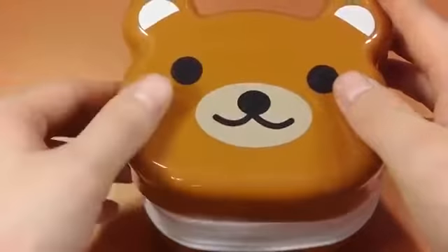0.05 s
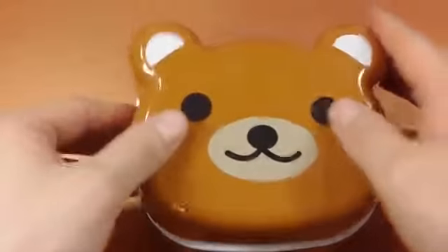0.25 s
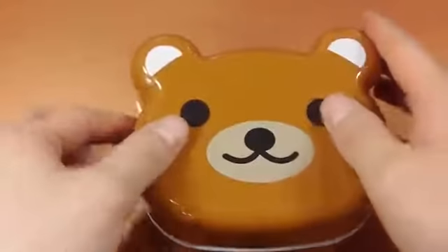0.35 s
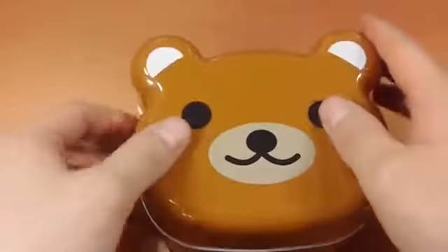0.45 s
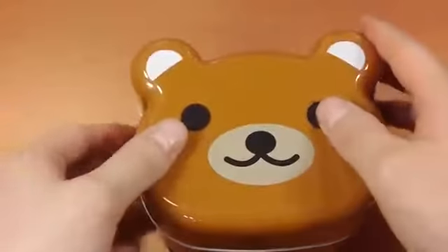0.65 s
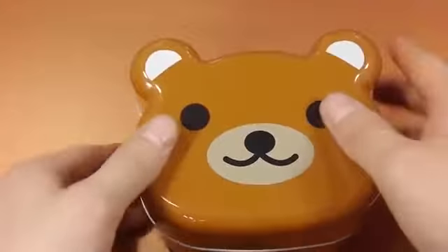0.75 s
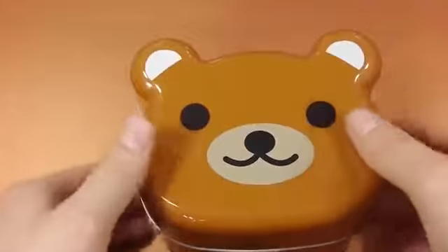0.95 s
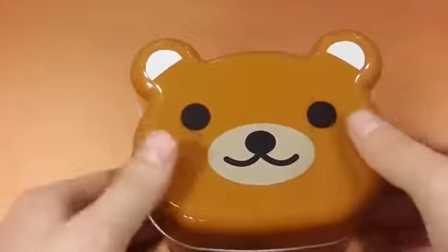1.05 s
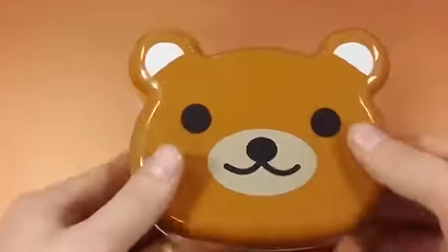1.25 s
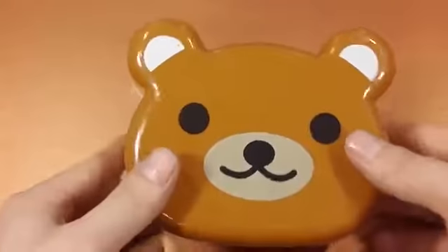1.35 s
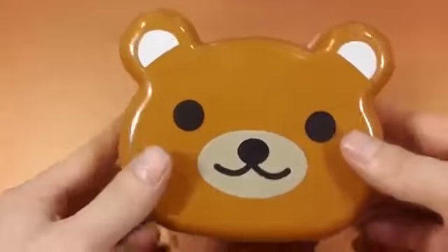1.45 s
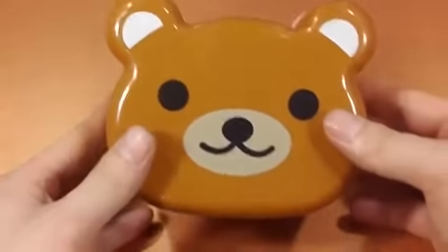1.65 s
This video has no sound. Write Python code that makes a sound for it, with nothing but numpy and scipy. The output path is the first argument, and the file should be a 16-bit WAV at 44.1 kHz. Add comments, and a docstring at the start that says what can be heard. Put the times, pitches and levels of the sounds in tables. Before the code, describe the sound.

A plastic lid clacks onto a hollow tub, rattles briefly and is pressed shut.

```python
"""A few light bumps, then a sharp plastic clack: a moulded lid lands on its tub, rocks and is pressed home.
Each contact rings the lid and the hollow tub and thumps the table, close by in a small quiet room.
The rim ticks and scrapes in tiny slips, and fingers rub and slide over the plastic.
A low room rumble lies under it all."""
import sys
import numpy as np
from scipy import signal
from scipy.fft import rfft, irfft, next_fast_len
from scipy.io import wavfile
from scipy.ndimage import map_coordinates

SR = 44100
rng = np.random.default_rng(int(sys.argv[2]) if len(sys.argv) > 2 else 0)


def generate_wav(signal):
    """Clip the signal to [-1, 1] and save it as 16-bit WAV at the path in sys.argv[1]."""
    frames = np.transpose(np.atleast_2d(signal))
    scaled = np.clip(frames, -1, 1) * 32767
    pcm = np.round(scaled).astype(np.int16)
    wavfile.write(sys.argv[1], SR, pcm)


N = 74970

# room rumble and hiss: freq_hz, density_db
AIR_SPECTRUM = [(15, -71), (25, -22), (43, -14), (121, 1), (167, -4.5), (309, -3.5), (383, -5.5),
                (501, -2.5), (749, -6), (856, -6.5), (978, -7), (1460, -14.5), (2130, -26.5), (3630, -30),
                (15000, -37.5)]
# faint drones in the room: pitch_hz, level_db
DRONES = [(66, -59), (104, -57.5), (143, -63), (766, -62)]
# length of the room's tail: freq_hz, t60_s
TAIL_DECAY = [(100, 0.36), (300, 0.36), (700, 0.35), (2000, 0.23), (5000, 0.32), (13000, 0.19)]
# colour of the room's tail: freq_hz, gain_db
TAIL_COLOUR = [(100, -10.5), (300, -9), (700, -8), (2000, -14), (5000, -11.5), (13000, -10)]

# strokes of fingers and rim: start_s, rise_s, fall_s, level_db, tilt_db_per_octave, resonance_hz
RUB_STROKES = [(0.137, 0.084, 0.37, -49.5, -1.5, 2240), (0.272, 0.0035, 0.21, -40.5, 0, 2540),
               (0.394, 0.032, 0.033, -51.5, 10, 5800), (0.93, 0.016, 0.98, -61, 0, 3630),
               (1.24, 0.095, 0.55, -51, -1, 4000), (1.46, 0.027, 0.47, -55, 14, 1770)]
# colour of the rubbing: freq_hz, density_db
RUB_SPECTRUM = [(150, -6), (500, 5), (1700, 2), (2700, -5), (5000, -9.5), (9000, -13), (15000, -22)]
# short drags of the rim: start_s, rise_s, length_s, level_db, resonance_hz, tilt_db_per_octave
RIM_SCRAPES = [(0.275, 0.0022, 0.028, -41.5, 2540, -0.5), (1.076, 0.012, 0.043, -47, 1730, -0.5)]
# colour of the scraping: freq_hz, density_db
SCRAPE_SPECTRUM = [(300, -10), (1500, 6), (2600, 1), (4000, -16), (6000, -3), (10000, -13), (15000, -12)]
# small ticks of the plastic edge: start_s, level_db, centre_hz
EDGE_TICKS = [(0.406, -48, 6900), (0.411, -44.5, 6100), (0.797, -45.5, 2040), (0.83, -42, 2750),
              (1.219, -62, 10200)]
# dull nudges of hand and tub on the table: start_s, level_db, pitch_hz
TABLE_NUDGES = [(0.31, -44, 130), (0.625, -39, 115), (1.06, -44, 143), (1.485, -45, 520)]

# the lid hitting the tub: start_s, level_db, cutoff_hz (higher is harder),
# crack_db, tub_db, thump_db, snap_db (layer trims on top of level_db),
# favoured_hz, favour_db (the band that the contact point brings out, and its boost)
CONTACTS = [(0.099, -27.5, 2630, -8.5, 5, -4, -11, 1620, 5),
            (0.185, -23.5, 1200, -4, -4, -19, -43, 654, 13),
            (0.2143, -11.5, 847, -13, 3, -5.5, -53, 920, 6.8),
            (0.2413, -20.5, 1400, 0, 7.5, -27, -13.5, 570, 7.7),
            (0.343, 0.5, 3880, -5, -1.5, -9, -13, 3510, 6.4), (0.407, -19, 1080, 2, -4, -14, -38, 470, 4.5),
            (0.429, -22, 1240, -2, -27, -29, -43, 1120, 16), (0.4431, -8, 4170, 1, -2, -1, 0, 820, 10.4),
            (0.4492, -6, 5600, 1.5, -5.5, -8.5, -8, 4460, 3.4),
            (0.4496, -13, 2400, 1, 5, 8.5, -33, 480, 10.5), (0.5083, -13.5, 2300, -7, -4, 9, -24, 1940, 5),
            (0.538, -9.5, 3140, 1.5, -6, 5, -13, 4150, 8.9), (0.6, -18, 2280, 6, -5, 10.5, -14, 2350, 9.6),
            (0.8436, -19.5, 2920, 4.5, 9, 17.5, -1, 2090, 6.3)]
# modes of the plastic lid: pitch_hz, level_db, t60_s
LID_MODES = [(660, -21, .03), (868, -13, .04), (958, -21, .03), (1120, -25, .04), (1305, -18, .035),
             (1430, -18, .028), (1690, -17, .026), (1810, -20, .026), (1925, -17, .024), (2380, -25, .022),
             (2710, -27, .024), (3620, -26, .02), (4200, -30, .018)]
# modes of the hollow tub: pitch_hz, level_db, t60_s
TUB_MODES = [(310, -25, .12), (436, -19, .07), (500, -17, .06), (555, -19, .055)]
# modes of the table under the tub: pitch_hz, level_db, t60_s
TABLE_MODES = [(99, -34, .18), (135, -26, .1), (243, -23, .07), (335, -22, .055)]
# the plastic's dense, quickly dying upper modes: freq_hz, density_db
CRACK_SPECTRUM = [(100, -35), (400, 3), (700, -4.5), (1000, -6), (1900, 0), (3100, -11), (5000, -6),
                  (10000, -21.5), (15000, -15)]
# colour of the edge snap's noise burst: freq_hz, density_db
SNAP_SPECTRUM = [(500, 11.5), (2500, -1), (5000, 2), (10000, -2), (15000, -8)]

PLASTIC_RISE_S, TABLE_RISE_S = .0003, .0012
FRICTION_PEAK_OCTAVES = .22


def amp(db):
    """Decibels to gain."""
    return 10 ** (np.asarray(db) / 20)


def unit(x):
    """Scale to rms 1."""
    return x / np.sqrt(np.mean(x ** 2) + 1e-20)


def along(points, hz):
    """Read a (freq_hz, value) curve on a log axis."""
    freqs, values = np.transpose(points)
    return np.interp(np.log(hz + 1), np.log(freqs + 1), values)


def bell(hz, centre_hz, octaves):
    """An EQ bell, 1 at its centre."""
    return np.exp(-(np.log2((hz + 1) / centre_hz) / octaves) ** 2)


def decay(t, t60_s):
    """Exponential decay, 60 dB in t60_s."""
    return np.exp(-np.log(1000) * t / t60_s)


def filtered(x, gain):
    """EQ a sound with a gain that depends on frequency."""
    size = next_fast_len(len(x) + 8192)
    return irfft(rfft(x, size) * gain(np.fft.rfftfreq(size, 1 / SR)), size)[:len(x)]


def noise(spectrum, size, tilt=0):
    """Coloured noise of rms 1, tilted in dB per octave."""
    white = rng.standard_normal(size)
    return unit(filtered(white, lambda hz: amp(along(spectrum, hz) + tilt * np.log2(hz + 1))))


def wobble(knots_per_s):
    """A smooth random curve."""
    return map_coordinates(rng.standard_normal(N), [np.arange(N) * knots_per_s / SR])


def add(track, start_s, sound):
    """Mix a sound into the track at start_s."""
    start = max(round(start_s * SR), 0)
    track[start:start + len(sound)] += sound[:N - start]


def ring(modes, t, rise_s, scatter_db=1):
    """Damped modes of alternating polarity, struck a little differently every time."""
    waves = np.zeros(len(t))
    for k, (hz, db, t60_s) in enumerate(modes):
        gain = (-1) ** k * amp(db + scatter_db * rng.normal())
        waves += gain * decay(t, t60_s) * np.sin(2 * np.pi * hz * t)
    return waves * (1 - np.exp(-t / rise_s))


def chatter_envelope(t, hold_s=.0012):
    """A brief hold while the edges chatter, then a fast decay."""
    return decay(np.maximum(t - hold_s, 0), t60_s=.025)


def in_room(x, predelay_s=.0067):
    """A sound plus its own diffuse tail in the room."""
    hz, t, bands = signal.stft(rng.standard_normal(SR // 2), SR, nperseg=256)
    tail = signal.istft(bands * decay(t, along(TAIL_DECAY, hz)[:, None]), SR)[1]
    tail = np.pad(tail / np.linalg.norm(tail), (round(predelay_s * SR), 0))
    tail = filtered(tail, lambda f: amp(along(TAIL_COLOUR, f)))
    return x + signal.fftconvolve(x, tail)[:len(x)]


def room_tone(air_db=-50, wander_per_s=9.04):
    """The bed: steady rumble and hiss with a few wavering drones."""
    drones, t = np.zeros(N), np.arange(N) / SR
    for hz, db in DRONES:
        waver = wobble(wander_per_s) + 1j * wobble(wander_per_s)  # level and phase both drift
        drones += amp(db) * unit(np.real(waver * np.exp(2j * np.pi * hz * t)))
    return amp(air_db) * noise(AIR_SPECTRUM, N) + drones


def rubs(grain_db=2, grains_per_s=2200, peak_db=2.5):
    """Skin and rim slide on the plastic: grainy friction swells and fades through one resonance."""
    track, t = np.zeros(N), np.arange(N) / SR
    for start_s, rise_s, fall_s, db, tilt, peak_hz in RUB_STROKES:
        stroke = np.minimum(t / rise_s, 1) * np.exp(-2 * np.maximum(t - rise_s, 0) / fall_s)
        grains = noise(RUB_SPECTRUM, N, tilt) * amp(grain_db * wobble(grains_per_s))
        friction = filtered(grains, lambda hz: amp(peak_db * bell(hz, peak_hz, FRICTION_PEAK_OCTAVES)))
        add(track, start_s, amp(db) * stroke * unit(friction))
    return track


def scrapes(slips_per_s=1800, scatter_db=2, peak_db=10):
    """The rim sticks and slips at an uneven rate; each slip is a tiny gritty click."""
    track, t = np.zeros(N), np.arange(SR // 2) / SR
    for start_s, rise_s, length_s, db, peak_hz, tilt in RIM_SCRAPES:
        slipping = rng.random(len(t)) < slips_per_s / SR
        slips = slipping * amp(scatter_db * rng.standard_normal(len(t)))
        grit = unit(signal.fftconvolve(slips, decay(t, t60_s=.005))[:len(t)])
        hiss = noise(SCRAPE_SPECTRUM, len(t), tilt)
        hiss = unit(filtered(hiss, lambda hz: amp(peak_db * bell(hz, peak_hz, FRICTION_PEAK_OCTAVES))))
        drag = np.minimum(t / rise_s, 1) * np.exp(-(t / length_s) ** 2)
        add(track, start_s, amp(db) * in_room(hiss * grit * drag))
    return track


def ticks():
    """Light catches of the edge, too small to ring the shell."""
    track, t = np.zeros(N), np.arange(SR // 2) / SR
    for start_s, db, centre_hz in EDGE_TICKS:
        band = unit(filtered(rng.standard_normal(len(t)), lambda hz: bell(hz, centre_hz, octaves=.75)))
        add(track, start_s, amp(db) * in_room(band * chatter_envelope(t)))
    return track


def nudges(t60_s=.4):
    """Hand and tub push softly on the table, each time waking one low mode with no click."""
    track, t = np.zeros(N), np.arange(SR // 2) / SR
    for start_s, db, hz in TABLE_NUDGES:
        add(track, start_s, ring([(hz, db, t60_s)], t, rise_s=.00087))
    return track


def plastic_crack(t, split_hz=3500):
    """The dense upper modes of one blow, the treble dying first."""
    modes = noise(CRACK_SPECTRUM, len(t))
    low = filtered(modes, lambda hz: 1 / (1 + (hz / split_hz) ** 4))
    return low * chatter_envelope(t) + (modes - low) * decay(t, t60_s=.02)


def edge_snap(t, click_hz=6500):
    """The edge snaps: a bright click at the onset, with a short burst of noise dying away."""
    click = amp(10) * np.sin(2 * np.pi * click_hz * t) * decay(t, t60_s=.0005)
    return click + noise(SNAP_SPECTRUM, len(t)) * decay(t, t60_s=.016)


def lid_knocks(flex_hz=850, low_cut_hz=82):
    """Each contact flexes the lid, snaps its edge and rings lid, tub and table; soft hits are duller."""
    track, t = np.zeros(N), np.arange(SR // 2) / SR
    flex = amp(2) * np.sin(2 * np.pi * flex_hz * t) * decay(t, t60_s=.003)  # the whole lid springs back
    for start_s, db, cutoff_hz, crack_db, tub_db, thump_db, snap_db, favoured_hz, favour_db in CONTACTS:
        def boost_db(hz):
            """The contact point brings out one narrow band."""
            return favour_db * bell(hz, favoured_hz, octaves=.13)

        def struck(modes, rise_s):
            """Ring the modes as struck at this point."""
            return ring([(hz, level + boost_db(hz), t60_s) for hz, level, t60_s in modes], t, rise_s)

        crack = amp(-7.5) * filtered(plastic_crack(t), lambda hz: amp(boost_db(hz)))
        attack = amp(crack_db) * (flex + crack)
        lid = struck(LID_MODES, PLASTIC_RISE_S)
        tub = amp(tub_db) * struck(TUB_MODES, PLASTIC_RISE_S)
        body = signal.lfilter(*signal.butter(3, cutoff_hz, fs=SR), attack + lid + tub)
        snap = amp(snap_db - 12) * edge_snap(t)
        thump = amp(thump_db) * struck(TABLE_MODES, TABLE_RISE_S)
        add(track, start_s, amp(db) * in_room(body + snap + thump))
    return signal.sosfilt(signal.butter(3, low_cut_hz, "highpass", fs=SR, output="sos"), track)


def scene():
    """A mono mix: the lid up front, handling noises under it, room tone behind."""
    return (lid_knocks() + nudges() + ticks() + scrapes() + rubs() + room_tone())[None]


def record(dry, top_hz=15050):
    """A brick-wall high cut takes off the very top."""
    return np.array([filtered(channel, lambda hz: hz < top_hz) for channel in dry])


dry = scene()
out = record(dry)
generate_wav(out)
```